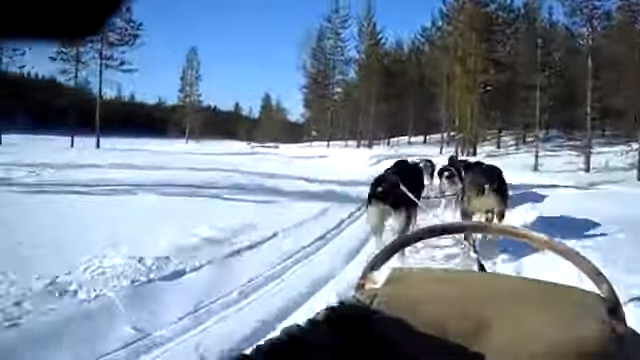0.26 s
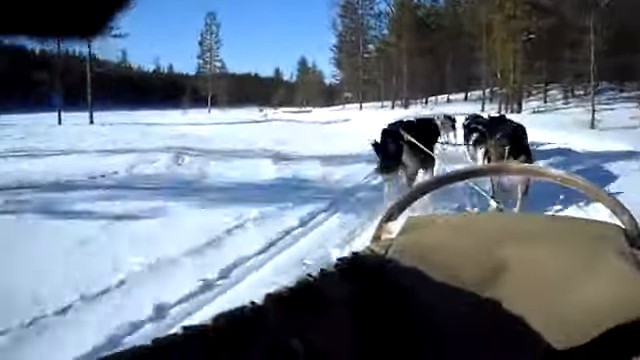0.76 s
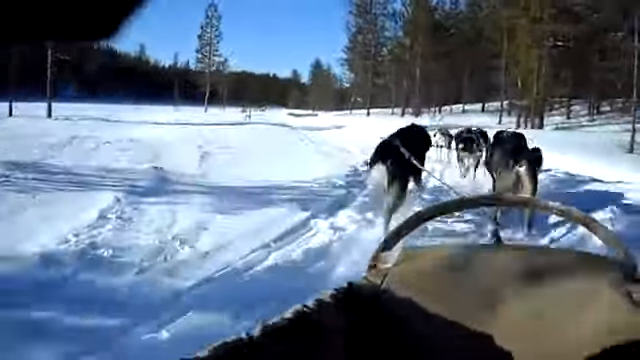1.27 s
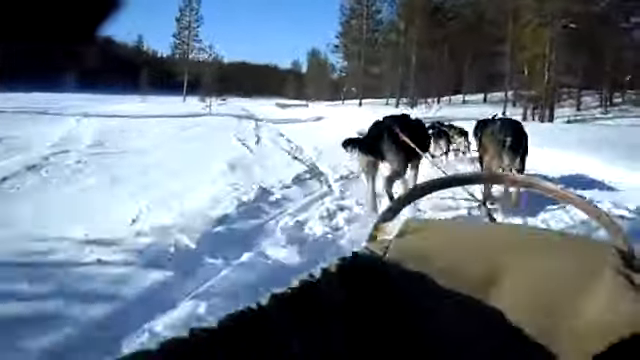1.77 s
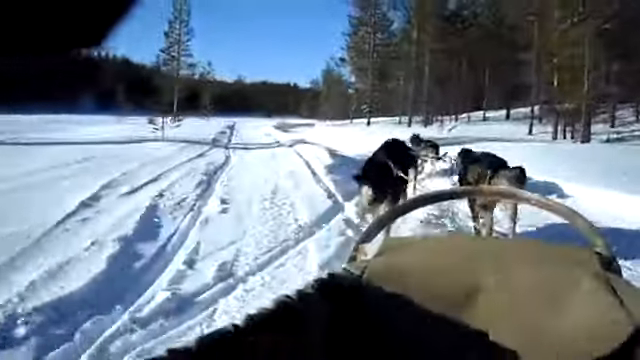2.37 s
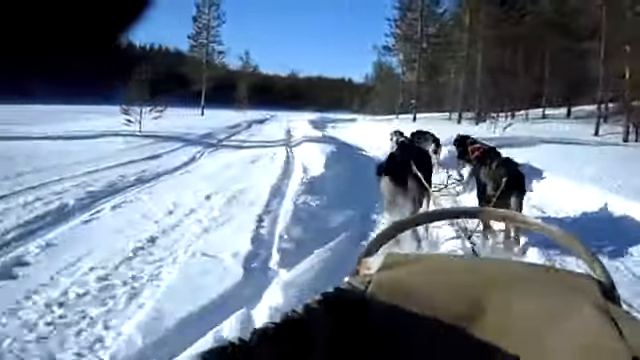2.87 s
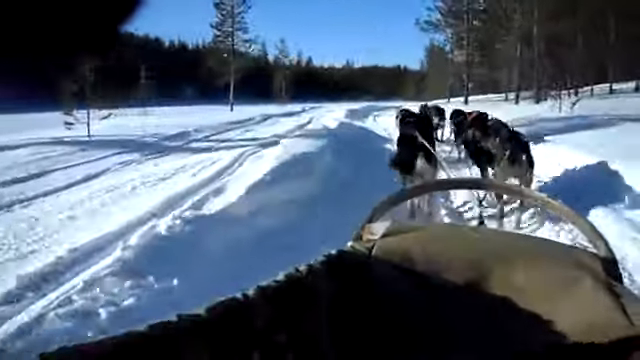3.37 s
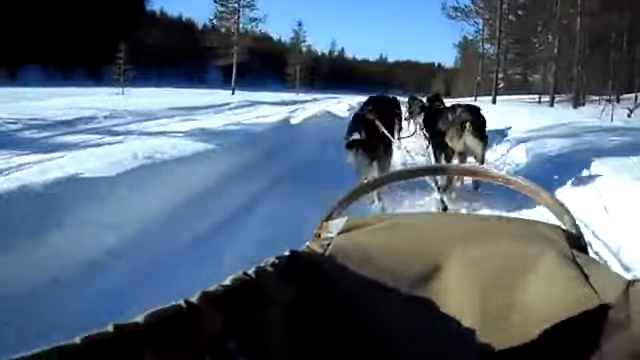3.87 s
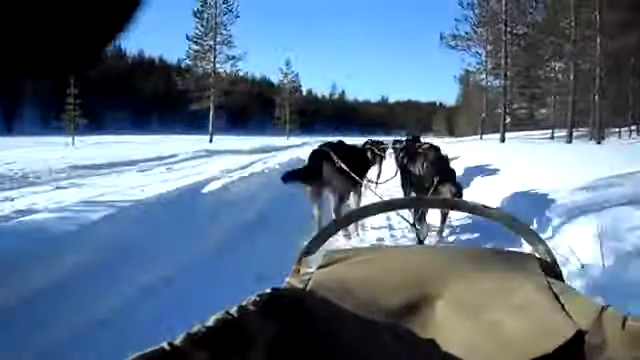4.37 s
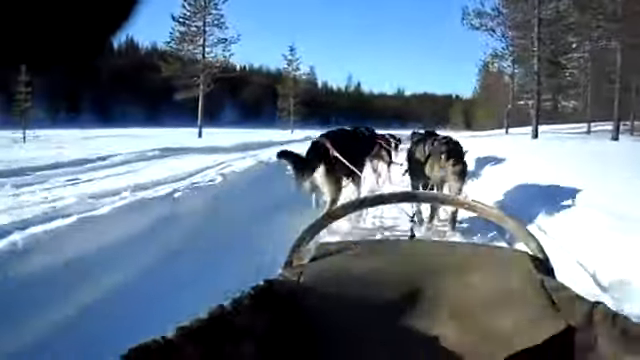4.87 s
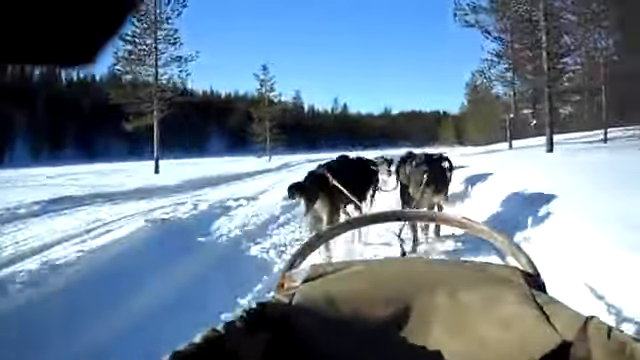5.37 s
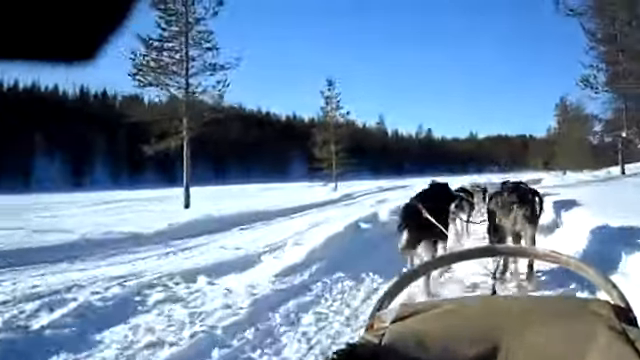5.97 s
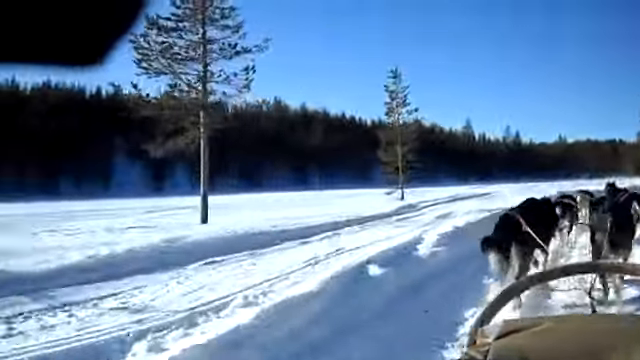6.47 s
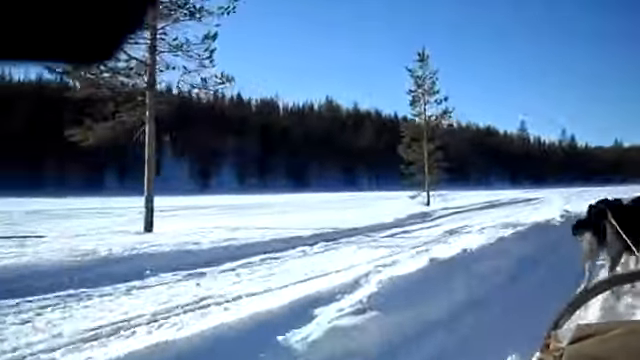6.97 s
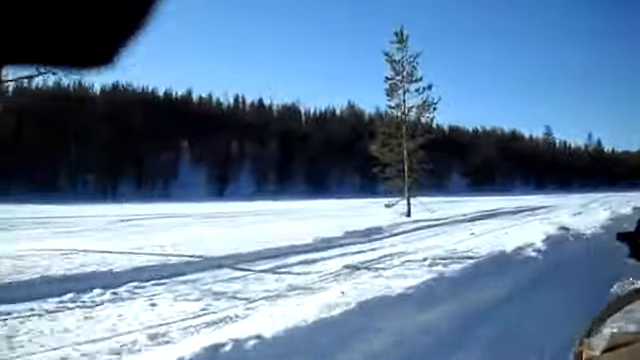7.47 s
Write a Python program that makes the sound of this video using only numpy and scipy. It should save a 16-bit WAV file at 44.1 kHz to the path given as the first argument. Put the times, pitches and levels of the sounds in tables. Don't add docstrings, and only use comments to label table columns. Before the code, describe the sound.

A sled rides over packed snow in open air, heard dry and very close by a small onboard camera with muffled treble and slight overload. Low headwind rumbles continuously, breaking into rapid fluttering puffs and thuds. Hard knocks and crust snaps cluster in the first 0.25 seconds, with a faint powder drift near 0.5. Strong buffets and clattering jolts hit at 1.3-1.5, then at 2.5-2.6. From 2.7 the runners bite harder, scraping, hissing and crunching; a hollow wooden slat knocks at 3.0 and more softly at 3.1. Bright cracks at 3.7 lead into heavy gusts and knocks around 3.8-3.9. After 4.1 the scrape eases to a thin gritty glide. Separate hard bumps land at 4.83, 5.68, 6.3-6.4 and, strongest, 6.87. Lighter wind puffs continue, and a final jolt and soft airy snow spray arrive around 7.7.

```python
import sys
import numpy as np
from scipy import signal
from scipy.fft import rfft, irfft, next_fast_len
from scipy.io import wavfile
from scipy.ndimage import uniform_filter1d, map_coordinates

SR = 44100
rng = np.random.default_rng(int(sys.argv[2]) if len(sys.argv) > 2 else 0)


def materialize(psi):
    bounded = np.clip(np.atleast_2d(psi).T, -1, 1)
    quanta = np.round(bounded * 32767).astype(np.int16)
    wavfile.write(sys.argv[1], SR, quanta)


def invert_db(level):
    return 10 ** (np.asarray(level, dtype=float) / 20)


N = 340452
FRAME = 8192

# time_s, headwind_db, runner_load_db, snow_dryness_db
RIDE = [(0.0, -34.5, -42, 1.5), (0.66, -25.5, -42.5, 0), (1.14, -36, -52.5, -2), (1.7, -28, -39, 0.5),
        (2.06, -35.5, -46, -1), (2.54, -29.5, -42, 0), (2.73, -30, -30.5, -2.5), (3.101, -29, -35.5, 1),
        (3.499, -31, -29.5, -4), (3.741, -21.5, -26, 0), (4.1, -31, -33.5, 3), (4.401, -35, -45.5, -0.5),
        (4.92, -38, -46.5, 1), (5.63, -30, -45, -0.5), (5.94, -35, -42.5, -2), (6.62, -33.5, -45, -1.5),
        (7.31, -33.5, -44, 1.5), (7.72, -25.5, -53.5, -1)]
# frequency_hz, density_db (per Hz)
EDGE_COLOUR = [(300, -30.5), (700, 6.5), (1100, 3), (1800, -4), (2600, -13), (4000, -31.5), (7500, -66.5)]


def unit(x):
    return x / np.sqrt(np.mean(x ** 2) + 1e-20)


def strength(x, size):
    power = uniform_filter1d(uniform_filter1d(x ** 2, size=size), size=size)
    return np.sqrt(np.abs(power))


def wobble(rate):
    knots = rng.standard_normal(int(N * rate / SR) + 4)
    return map_coordinates(knots, [np.arange(N) * rate / SR])


def gain_at(spectrum, size):
    hz, db = np.transpose(spectrum)
    grid = np.log(np.fft.rfftfreq(size, 1 / SR) + 1)
    return invert_db(np.interp(grid, np.log(hz), db, left=-120))


def coloured(x, spectrum):
    m = next_fast_len(N + FRAME)
    return irfft(rfft(x, m) * gain_at(spectrum, size=m), m)[:N]


def patchy(depth_db, bins, frames):
    z = signal.stft(rng.standard_normal(N + FRAME), nperseg=512)[2]
    field = uniform_filter1d(rng.standard_normal(z.shape), size=bins, axis=0)
    field = uniform_filter1d(field, size=frames, axis=1)
    return signal.istft(z * invert_db(depth_db * unit(field)), nperseg=512)[1][:N]


def crystals(rate, spread_db):
    hit = rng.random(N) < rate / SR
    return unit(hit * rng.uniform(-1, 1, N) * invert_db(spread_db * rng.uniform(-1.5, 1, N)))


def puffs(rows, shape, gain):
    out = np.zeros(N + 2 * FRAME)
    t = (np.arange(FRAME) - FRAME // 2) / SR
    for s, db, ms, *colour in rows:
        swell = shape(t / (abs(ms) / 1000))
        puff = irfft(rfft(rng.standard_normal(FRAME)) * gain(*colour), FRAME) * swell
        level = invert_db(db) * np.sqrt(np.sum(swell ** 2) / np.sum(puff ** 2))
        out[min(round(s * SR), N):][:FRAME] += puff * level
    return out[FRAME // 2:][:N]


def ride_levels():
    s, *levels = np.transpose(RIDE)
    return [np.interp(np.arange(N) / SR, s, level) for level in levels]


def headwind(bumps):
    # frequency_hz, density_db (per Hz)
    rumble_colour = [(50, -24.5), (90, -6), (130, -1.5), (250, -3.5), (450, -13), (800, -20), (1600, -55)]
    wind_db, _, _ = ride_levels()
    lumps = invert_db(3.04 * bumps + 3.06 * wobble(11))
    rumble = unit(lumps * coloured(patchy(2.2, bins=2, frames=5), rumble_colour))
    return invert_db(wind_db + 2.0) * rumble


def spray():
    swells = [
        (0.49, -47, 33),
        (7.63, -49, 33),
        (7.7, -46, 28),
        (7.8, -58.5, 12),
    ]
    airy = invert_db(-9 * np.log2((np.fft.rfftfreq(FRAME, 1 / SR) + 1) / 4800) ** 2)
    return puffs(swells, lambda u: np.exp(-(u / 2.8) ** 2), lambda: airy)


def slat():
    # start_s, peak_db, spread_ms, pitch_hz
    knocks = [
        (2.977, -6, 2.1, 733),
        (3.099, -14.5, 1.7, 756),
    ]
    f = np.fft.rfftfreq(FRAME, 1 / SR)
    return puffs(knocks, lambda u: np.exp(-(u / 1.4) ** 2), lambda hz: 1 / (1 + ((f - hz) / 140) ** 2))


def snaps():
    # start_s, peak_db, spread_ms
    breaks = [(0.009, -24, 3.5), (0.1217, -23, 1.4), (0.196, -31, 1.9), (0.2132, -21.5, 1.5),
              (1.083, -34.5, 2.2), (1.3013, -26, 0.7), (1.332, -35, 1.1), (1.536, -31, 0.96),
              (1.712, -32.5, 0.66), (1.788, -33, 1.9), (2.4903, -32.5, 1.3), (2.6053, -30, 1.5),
              (2.7146, -22.5, 1.1), (2.763, -28, 2.6), (2.9024, -30.5, 2), (2.9402, -34, 3.4),
              (3.3666, -31, 1.2), (3.439, -31.5, 1.1), (3.55, -27.5, 1.6), (3.5877, -31.5, 2.8),
              (3.726, -12.5, 1), (3.7373, -8, 0.88), (3.8034, -27, 0.62), (3.8766, -25, 1.1),
              (3.8998, -26, 0.7), (3.9138, -27, 1.5), (3.9593, -29, 1.4), (4.1765, -32, 2.4),
              (6.8706, -20.5, 2), (6.9588, -32.5, 1.4)]
    after_ms, after_db = 17, -16.5
    again = [(s + after_ms * rng.uniform(.5, 1.3) / 1000, min(db, -25) + after_db, ms) for s, db, ms in breaks]
    bright = invert_db(-6.5 * np.log2((np.fft.rfftfreq(FRAME, 1 / SR) + 1) / 2700) ** 2)

    def strike(u):
        decay = np.exp(-np.maximum(u + 1.24, 0) / 1.82)
        return decay * (1 - np.exp(-4 * np.maximum(u + 0.92, 0)))

    return invert_db(6.5) * puffs([*breaks, *again], strike, lambda: bright)


def runners(bumps):
    scrape_colour = [(250, -33.5), (500, 8.5), (800, -0.5), (1300, 3), (1800, -2), (2200, -13),
                     (3000, -18.5), (5000, -27)]
    hiss_colour = [(1200, -20.5), (2400, 2), (3500, 0), (4500, -3), (5600, -7.5), (6600, -8), (7400, -10.5)]
    crust_colour = [(600, -22.5), (1400, 5), (2600, 4.5), (4000, -4), (7400, -20)]
    _, load_db, dry_db = ride_levels()
    extra_load = load_db + 46.5
    hiss_db = -49.5 + 0.31 * extra_load + dry_db
    crunch_db = -55.5 + 0.87 * extra_load

    grit = 0.39 * crystals(500, spread_db=1.5)
    chatter = invert_db(1.0 * bumps + 2.9 * wobble(60) + 1.2 * wobble(7.5))
    scrape = unit(chatter * coloured(patchy(0.66, bins=4, frames=4) + grit, scrape_colour))

    fizz = 0.32 * crystals(770, spread_db=16.0)
    flutter = invert_db(0.15 * bumps + 2.0 * wobble(45))
    grains = patchy(1.5, bins=8, frames=3) + 0.13 * grit + fizz
    hiss = unit(flutter * coloured(grains, hiss_colour))

    clods = strength(crystals(55, spread_db=2.5), size=110)
    crunch = unit(clods * coloured(rng.standard_normal(N), crust_colour))
    return invert_db(load_db + 1.5) * scrape + invert_db(hiss_db + 1.75) * hiss + invert_db(crunch_db) * crunch


def jolts():
    # start_s, peak_db, spread_ms
    knocks = [(0.0085, -15.5, 1.8), (0.1257, -13.5, 1.6), (0.2305, -15.5, 1.8), (0.6157, -27, 1.7),
              (0.7985, -20, 1.8), (0.8543, -28.5, 1), (1.3047, -11.5, 0.71), (1.3317, -16.5, 1.2),
              (1.3367, -11, 0.77), (1.3975, -13, 1.2), (1.523, -16, 0.65), (1.534, -18, 1),
              (1.9119, -25, 2.3), (2.1314, -20.5, 1.2), (2.4919, -17.5, 2.1), (2.6046, -12, 0.96),
              (3.8214, -15.5, 0.96), (3.8939, -14, 3.5), (3.9034, -8.5, 0.82), (3.9166, -10, 1.3),
              (3.9283, -17, 0.73), (4.8292, -8, 0.93), (4.857, -10.5, 0.94), (5.6755, -9, 0.83),
              (5.6814, -17.5, 2.4), (6.166, -24.5, .8), (6.324, -18.5, 1.2), (6.4054, -19, 1.9),
              (6.8731, -6.5, 2.3), (7.685, -19, 0.97)]
    # delay_ms, relative_db, spread_ms
    bounces = [
        (-5, -11.5, .6),
        (4.5, -8.5, 0.55),
        (14.5, -15.5, 0.5),
    ]
    extra = [(s + delay / 1000, db + less + 3 * rng.standard_normal(), spread)
             for s, db, _ in knocks for delay, less, spread in bounces]
    edge = gain_at(EDGE_COLOUR, size=FRAME)
    return invert_db(1.0) * puffs([*knocks, *extra], lambda u: np.exp(-(u / 1.62) ** 2), lambda: edge)


def shaken(wind):
    # frequency_hz, density_db (per Hz)
    sway_colour = [(12, -30.5), (28, 9), (60, 12.5), (100, 12), (200, -43.5)]
    lumps = invert_db(2 * wobble(15))
    sway = unit(lumps * coloured(rng.standard_normal(N), sway_colour))
    rattle = unit(coloured(crystals(220, spread_db=5.0), EDGE_COLOUR))
    rocking = invert_db(-15.5) * strength(wind, size=1500) ** 0.74 * sway
    return rocking + invert_db(-19.5) * strength(wind, size=250) * rattle


def shed():
    # start_s, length_ms, first_db, last_db
    flurries = [(0.209, 50, -19.5, -20), (0.593, 19, -20, -17.5), (0.818, 37, -16, -17),
                (1.316, 41, -12.5, -11), (1.384, 48, -15, -16.5), (1.502, 86, -18.5, -14.5),
                (2.203, 62, -18.5, -26), (2.547, 71, -16, -20.5), (2.718, 69, -21.5, -22.5),
                (2.891, 79, -17.5, -19), (3.159, 79, -19, -19.5), (3.53, 80, -13, -14.5),
                (3.625, 50, -21.5, -14.5), (3.784, 45, -13.5, -16.5), (3.879, 84, -11.5, -18),
                (4.102, 36, -22, -20.5), (4.481, 64, -25.5, -21.5), (4.7, 40, -28.5, -27.5),
                (4.868, 41, -18.5, -20.5), (5.08, 70, -23.5, -23), (5.286, 27, -25.5, -18),
                (5.454, 69, -26, -17.5), (6.104, 44, -27, -21.5), (6.325, 62, -10.5, -13.5),
                (6.55, 36, -20.5, -17.5), (6.627, 8, -22.5, -23.5), (6.805, 50, -16.5, -16.5),
                (6.888, 17, -14, -16.5), (7.597, 31, -14.5, -20.5), (7.662, 40, -23.5, -17)]
    # start_s (of the centre), peak_db, spread_ms
    lone = [(0.0342, -19, 2.8), (0.0744, -18, 2), (0.3205, -16.5, 4.1), (0.3884, -21.5, 0.55),
            (0.4928, -20, 3.6), (0.736, -18, 5.7), (0.9433, -22.5, 2.6), (4.18, -20, 7), (1.7419, -15, 1.1),
            (1.8193, -21.5, 3.7), (2.0418, -28.5, 4.6), (2.1157, -25, 2.5), (3.0026, -17, 6),
            (3.7232, -26, 1.1), (4.3127, -21, 4), (4.8146, -21, 5.7), (4.988, -17.5, 8.3),
            (5.5931, -22.5, 3.8), (5.691, -14.5, 1), (5.8442, -23.5, 3.5), (6.033, -27, 3.9),
            (6.2174, -24.5, 2.2), (6.2732, -22.5, 1.8), (6.423, -24, 2.6), (6.9529, -23.5, 4),
            (7.0213, -20.5, 1.5), (7.0784, -18.5, 3), (7.1689, -19.5, 2.7), (7.4012, -23, 1.7),
            (7.499, -24.5, 2.6)]
    gap_ms, jitter_ms, spread_ms, scatter_db = 16.5, 2.5, 3.3, 1.0
    start, length, first, last = np.transpose(flurries)[..., None]
    count = np.arange(7)
    chance = rng.standard_normal((len(flurries), 7, 4))
    ms = gap_ms * count + jitter_ms * chance[..., 0] * (count > 0)
    db = first + (last - first) * ms / length + scatter_db * chance[..., 1]
    db = db - 2 * np.maximum(ms - length, 0)
    trains = np.stack([start + ms / 1000, db, spread_ms * np.exp(0.26 * chance[..., 2])], axis=-1)
    rows = np.vstack([trains.reshape(-1, 3), lone])
    octaves = 0.0369 * (np.maximum(rows[:, 1], -30) + 20) + 0.18 * rng.standard_normal(len(rows))
    return np.column_stack([rows, 226 * 2 ** octaves]).tolist()


def gusts():
    # start_s (of the centre), peak_db, spread_ms, pitch_hz
    strong = [(0.0102, -9.5, 1.7, 225), (0.121, -10, 4.6, 405), (0.228, -13, 4.3, 373),
              (0.5655, -12, 1.5, 254), (0.6253, -13, 4.1, 450), (0.7186, -14.5, 2.1, 291),
              (0.8002, -9.5, 3, 272), (0.8501, -13, 2.8, 328), (1.0189, -14.5, 3.1, 219),
              (1.3023, -5, 2.6, 227), (1.3307, -6, 5, 383), (1.3993, -18.5, 3.2, 380),
              (1.5373, -12, 2.8, 202), (1.9094, -10.5, 4.2, 172), (2.1324, -13, 2.8, 250),
              (2.4871, -7, 3.7, 270), (2.62, -8.5, 5, 271), (2.9762, -23, 2.1, 600),
              (3.0972, -11, 2.7, 324), (3.7994, -7.5, 0.95, 429), (3.9004, -11, 8.6, 336),
              (3.9288, -10, 2.2, 457), (4.8323, -7.5, 2.9, 463), (4.8525, -7.5, 6, 391),
              (4.96, -11.5, 3.8, 297), (5.6768, -13.5, 4.7, 335), (6.1632, -10, 1.3, 194),
              (6.4077, -13, 5.6, 449), (6.8719, -5.5, 4.3, 320), (7.2034, -14.5, 3, 211)]
    f = np.fft.rfftfreq(FRAME, 1 / SR) + 1

    def eddy(hz):
        octave = np.log2(f / hz)
        return invert_db(np.where(f > hz, -9 * np.abs(octave) ** 1.377, 5 * octave))

    return puffs([*strong, *shed()], lambda u: np.exp(-(u / 2.17) ** 2), eddy)


def scene():
    bumps = wobble(28)
    wind = headwind(bumps) + gusts()
    heavy = wind + shaken(wind) + jolts()
    overshot = heavy * (1 + 0.52 * np.clip(heavy ** 2, 0, 1))
    return (overshot + slat() + snaps() + spray() + runners(bumps))[None]


def roll_off(x):
    return signal.sosfilt(signal.butter(12, 15900, fs=SR, output="sos"), x)


def record(dry):
    top_hz = 7664
    band = [(5, 0), (top_hz - 250, 0), (top_hz, -18), (top_hz + 200, -50), (20000, -80)]
    narrow = coloured(np.clip(dry[0], -1.0, 1.0), band)
    step_colour = [(100, 4), (15000, -3.0), (16000, -34), (21000, -32.0)]
    steps = unit(coloured(rng.standard_normal(N), step_colour))
    fizz = (invert_db(-100) + invert_db(-66) * np.abs(narrow)) * steps
    mix = (np.clip(narrow, -1.01, 1.01) + fizz)[None]
    return roll_off(mix)


dry = scene()
out = record(dry)
materialize(out)
```